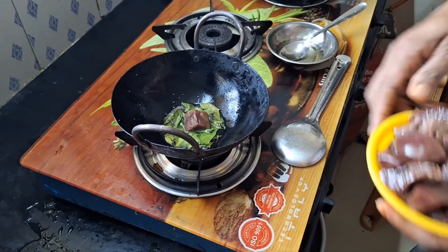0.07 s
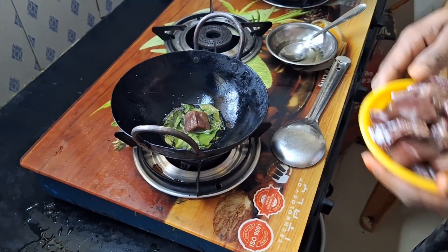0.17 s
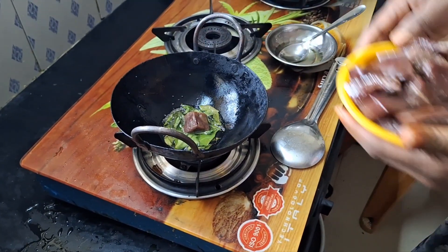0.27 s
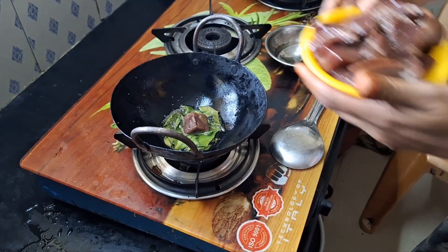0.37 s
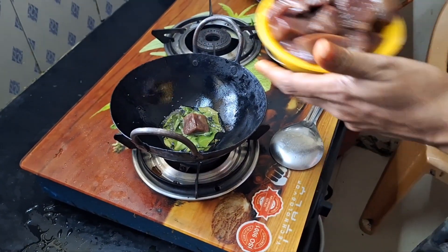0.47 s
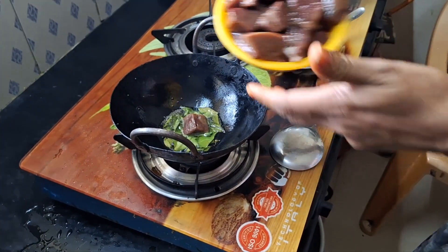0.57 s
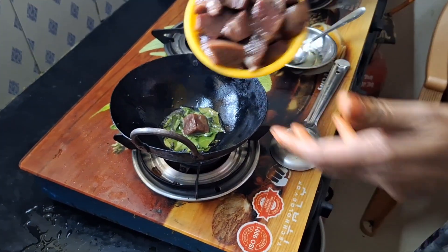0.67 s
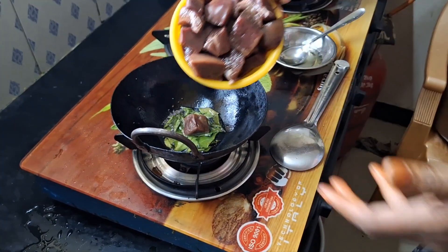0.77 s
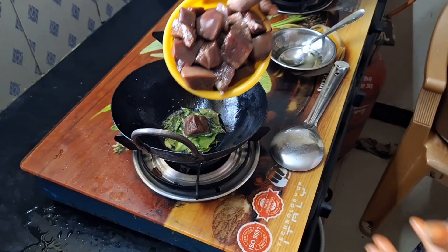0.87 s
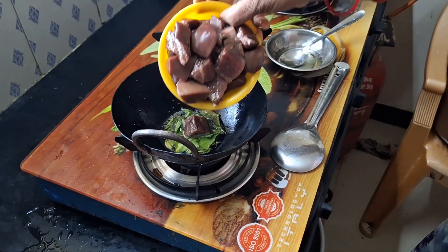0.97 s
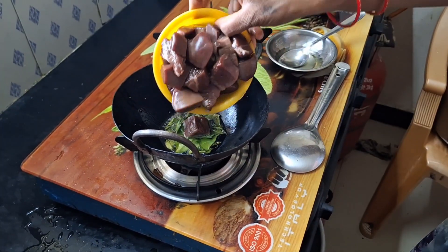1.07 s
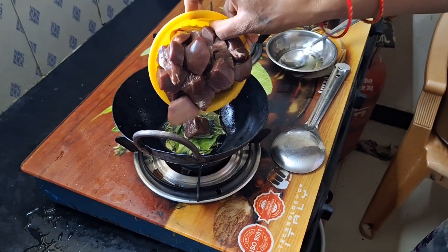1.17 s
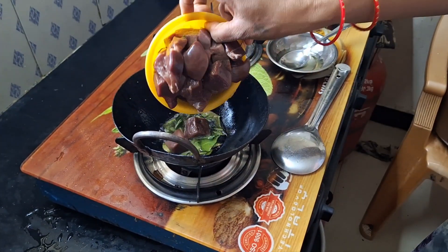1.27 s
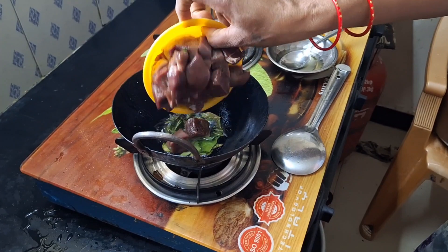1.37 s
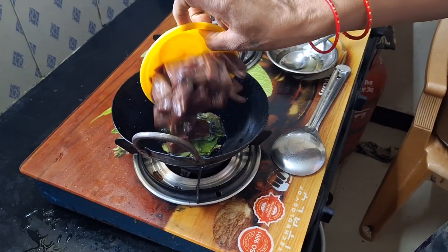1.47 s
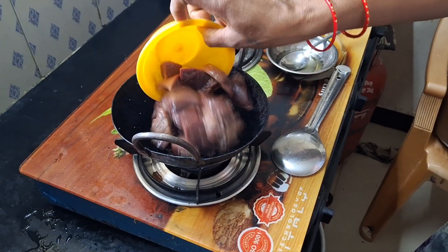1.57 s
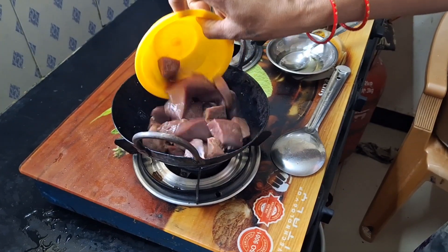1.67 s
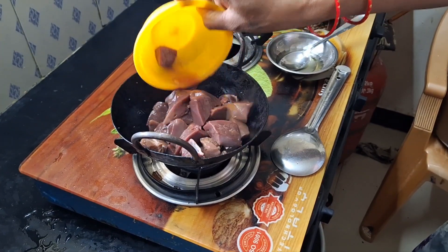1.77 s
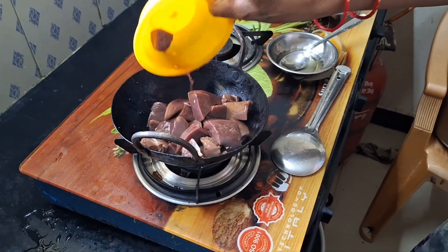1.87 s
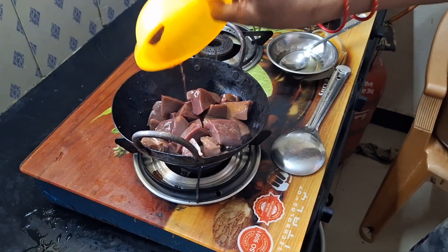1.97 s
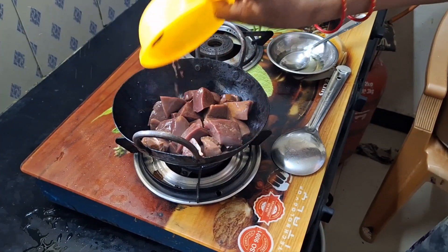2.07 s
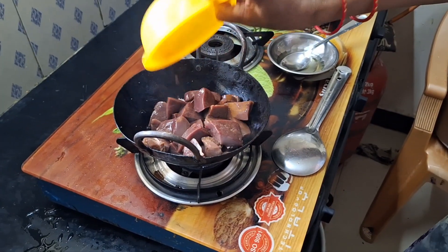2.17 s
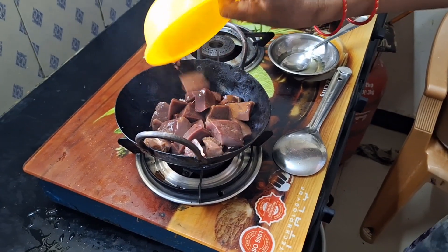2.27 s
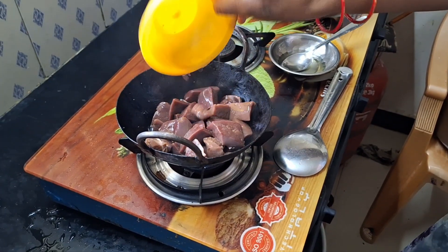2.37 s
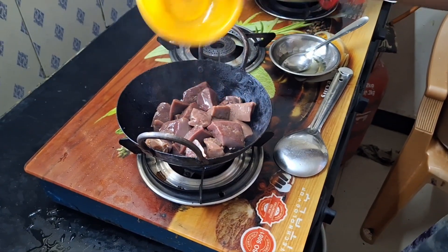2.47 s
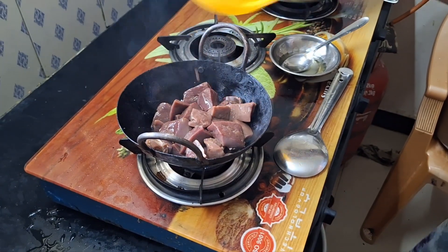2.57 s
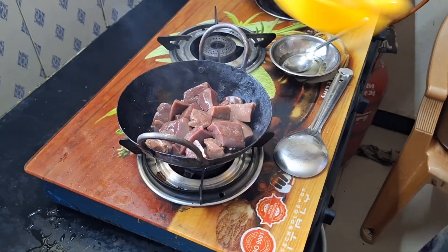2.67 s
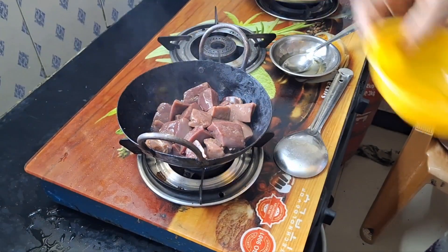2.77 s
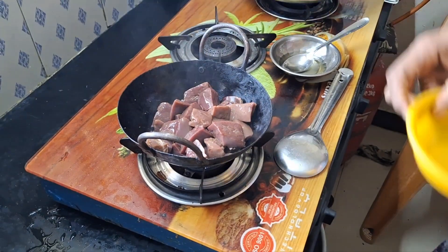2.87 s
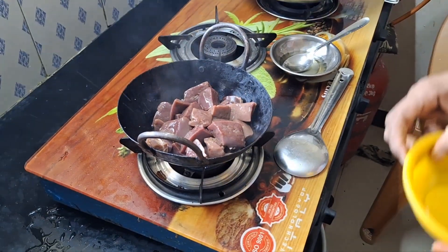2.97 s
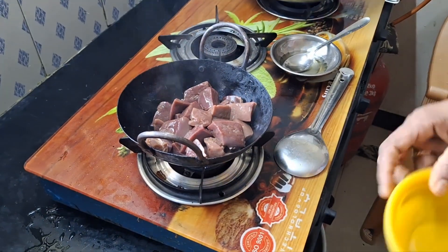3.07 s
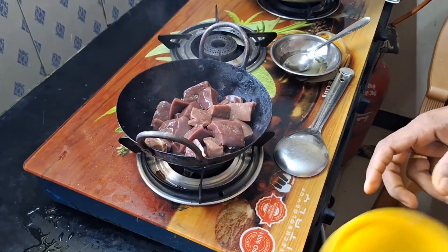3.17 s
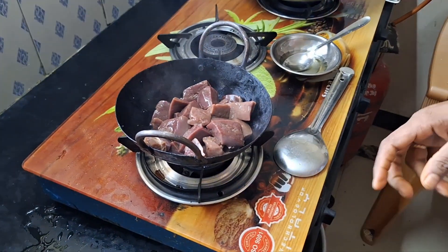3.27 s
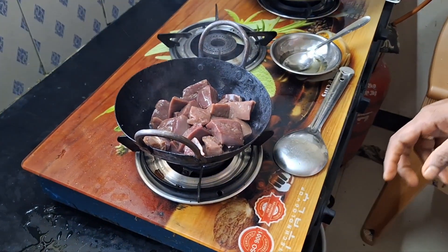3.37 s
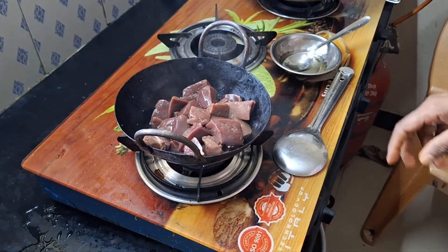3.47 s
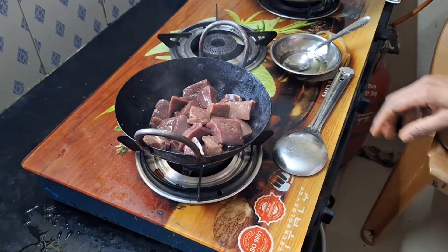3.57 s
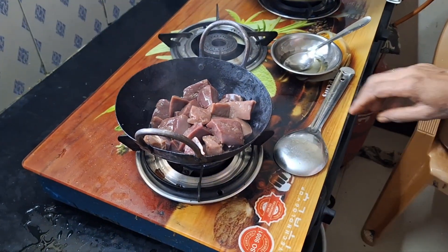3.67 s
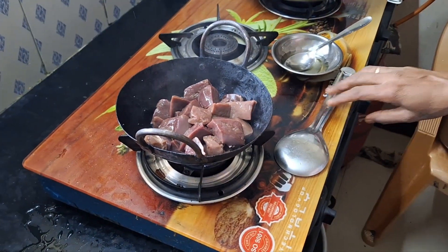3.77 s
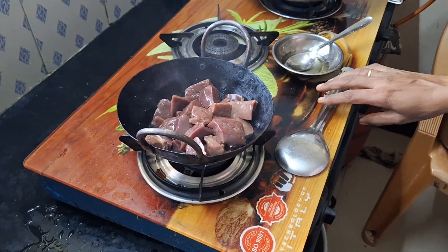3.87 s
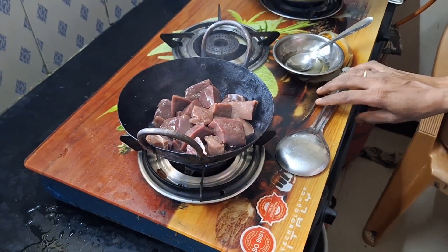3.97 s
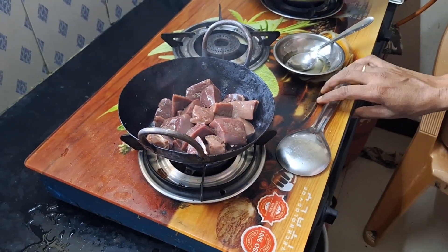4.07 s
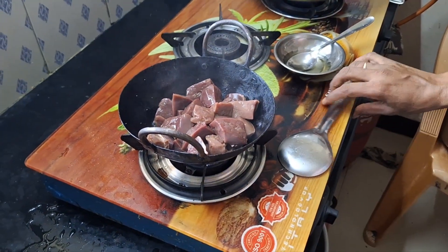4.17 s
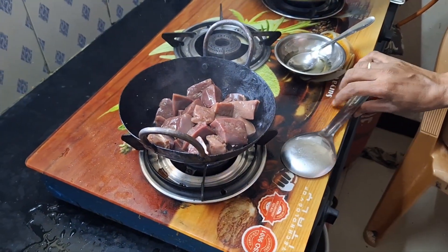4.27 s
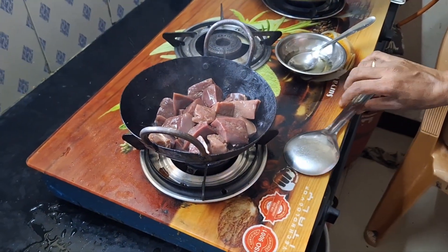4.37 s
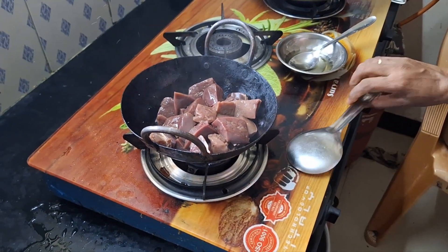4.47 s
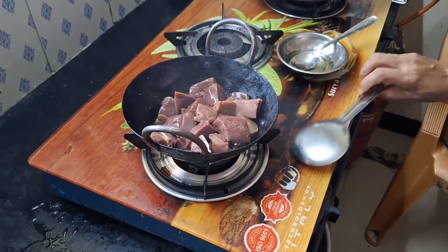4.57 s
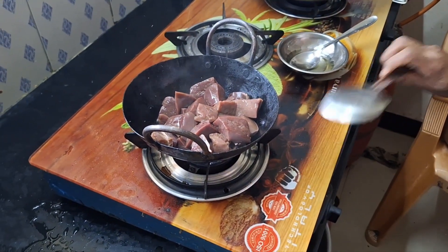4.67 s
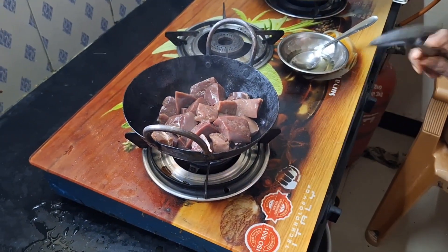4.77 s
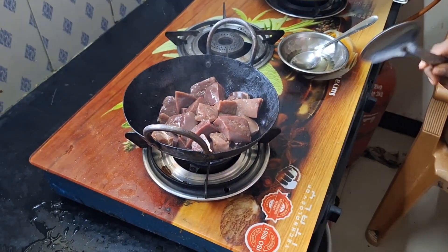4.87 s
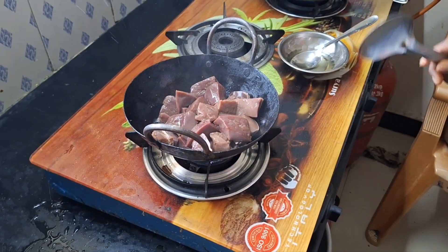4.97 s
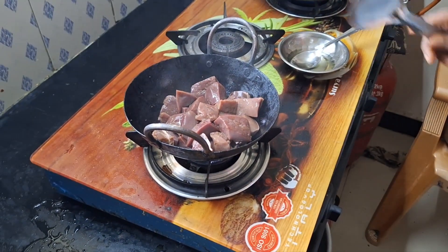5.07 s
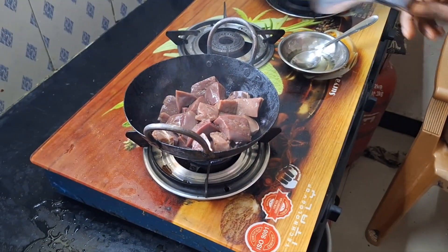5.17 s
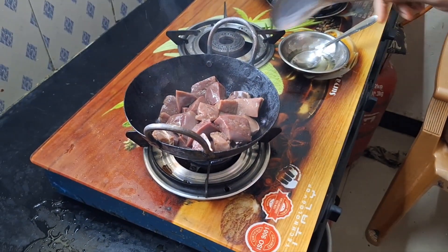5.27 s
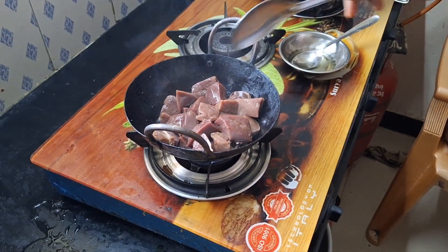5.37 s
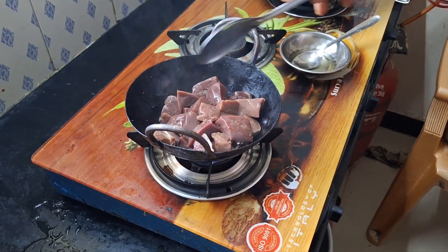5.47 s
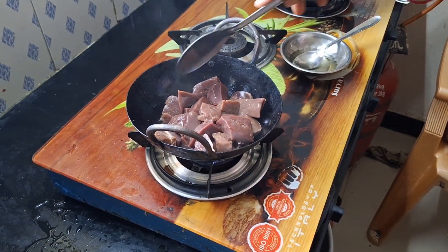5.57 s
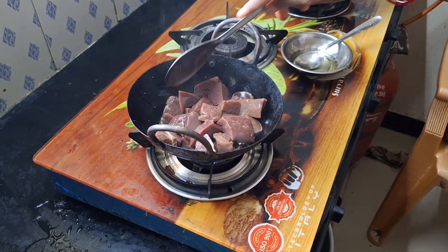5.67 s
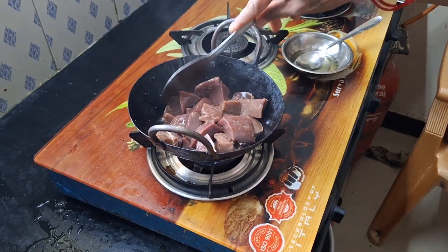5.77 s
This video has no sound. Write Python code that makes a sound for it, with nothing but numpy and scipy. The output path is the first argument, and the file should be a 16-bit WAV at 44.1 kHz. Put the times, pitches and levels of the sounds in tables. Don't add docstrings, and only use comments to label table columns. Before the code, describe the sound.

Over a low motor hum, isolated oil pops give way to a sudden loud frying hiss, with bright spits and soft knocks in a small kitchen.

```python
import sys
import numpy as np
from scipy import signal
from scipy.fft import rfft, irfft, next_fast_len
from scipy.io import wavfile
from scipy.ndimage import uniform_filter1d

SR = 44100
rng = np.random.default_rng(int(sys.argv[2]) if len(sys.argv) > 2 else 0)


def natural_amplitude(level_db):
    exponent = np.asarray(level_db, float) / 20
    return 10 ** exponent


def bounce(signal):
    frames = np.transpose(np.atleast_2d(signal))
    limited = np.clip(frames, -1, 1)
    pcm = np.round(limited * 32767).astype(np.int16)
    wavfile.write(sys.argv[1], SR, pcm)


N = 257233

# pitch_hz, level_db (per Hz)
PAN_COLOUR = [(250, -36), (430, -15.5), (660, -13.5), (850, -13), (1100, -4), (1490, -9.5), (2000, -3),
              (2500, 1), (3500, -1.5), (5800, 0.94), (7740, 1.16), (8730, -1.5), (11500, -2.5),
              (15600, -7.5)]


def frying():
    level_db, size_db, _ = vigour()
    length = next_fast_len(N + SR // 2, True)
    wet = 0
    for bubbles in fizz():
        path = way(wall_db=6.5, bowl_db=10.0, bowl_t60=0.013)
        wet = wet + rfft(bubbles, length) * rfft(path, length)
    even_hz = 250
    power = uniform_filter1d(abs(wet) ** 2, int(even_hz * length / SR), axis=1)
    wet = irfft(wet / np.sqrt(power), length)[:, :N]
    low, mid, top = split(colour(wet, PAN_COLOUR), 3200, 9000)
    clump_db = 1.6 * drift(30)
    low = natural_amplitude(1.12 + size_db + clump_db) * low
    top = natural_amplitude(-0.7 - 0.81 * size_db) * top
    return natural_amplitude(level_db + 5.5) * (low + mid + top) / mid.std()


# start_s, level_db, bubble_size_db (large ones up, fine spray down)
FRYING = [(0, -58.5, -6), (.6, -63.5, 4), (1.25, -56, -2.5), (1.45, -46.5, 0), (1.52, -54.5, 1.5),
          (1.59, -42, 4.5), (1.678, -24, -3.5), (1.74, -29.5, -1.5), (2.3, -29, 1), (2.6, -29, -1),
          (3.12, -29.5, 2), (3.25, -31.5, 1), (3.7, -30.5, 1), (4.4, -31, 0), (5.0, -32, 0.4),
          (5.83, -33, 1)]
# start_s, depth_db, length_s
LULLS = [
    (1.984, -5.5, 0.028),
    (2.177, -3.5, 0.015),
    (2.339, -4, .03),
    (2.81, -1, 0.033),
    (4.593, -4, 0.027),
    (4.743, -6.5, 0.017),
    (5.4, -2.5, 0.034),
    (5.553, -2.5, 0.026),
]


def vigour():
    start_s, level_db, size_db = np.transpose(FRYING)
    lull_s, depth_db, length_s = np.transpose(LULLS)
    t = np.arange(N) / SR
    steady_db = np.interp(t, start_s, level_db)
    lulls_db = fine(depth_db @ bumps(lull_s, length_s))
    return steady_db + lulls_db, np.interp(t, start_s, size_db), steady_db


def fizz(per_s=4500, spread_db=4.0, clump_db=0.79, hiss_db=-3.5, count=24, size=8):
    happens = rng.random(N) < per_s / SR
    strength = natural_amplitude(spread_db * np.minimum(rng.exponential(1, N), 3.9)) * happens
    kind = rng.integers(0, count, N)
    t = np.arange(300) / SR
    out = np.zeros((size, N))
    for k, hz in enumerate(np.geomspace(500, 17000, count)):
        glide = rng.uniform(-0.055, 0.094)
        turns = hz * t * (1 + glide * hz * t)
        grain = np.sin(2 * np.pi * turns) * np.exp(-hz * t / 2.42) * (turns < 12)
        grain = grain / np.linalg.norm(grain) * np.sqrt(hz)
        out[k % size] += signal.oaconvolve(strength * (kind == k), grain)[:N]
    hiss = natural_amplitude(hiss_db) * rng.standard_normal((size, N))
    return (evened(out) + hiss) * natural_amplitude(clump_db * drift(90))


# start_s, peak_db, bubble_pitch_hz, low_part_db (against the peak)
SPITS = [(1.963, -3.5, 4370, -7), (2.0625, -24, 5690, -22), (2.139, -7, 4600, -13), (2.2257, -8, 4430, -7),
         (2.2364, -4, 2390, -10), (2.375, -6, 9900, -13), (2.4912, -11, 6780, -25), (2.5394, -7, 2400, -5),
         (2.5627, -1.5, 6340, -5), (2.588, 2.5, 2620, -13.5), (2.6457, -5, 8000, -28),
         (2.8614, -10, 6950, -24), (2.9455, -16, 5170, -17), (2.9703, -14, 5880, -24),
         (3.0355, -11, 2480, -13), (3.0778, -1.5, 6200, -27), (3.1203, -2.5, 6100, -6),
         (3.1544, -16, 4580, -17), (3.3793, -7, 8140, -10), (3.5747, 1.5, 2980, -10.5),
         (3.6484, -10, 2480, -12), (3.8315, -10, 5940, -25), (3.921, -13, 6830, -21),
         (4.2674, -7, 6240, -16), (4.4061, -5.5, 4690, -10), (4.903, -5, 6800, -15), (4.934, -8, 6100, -21),
         (4.9753, -7, 6390, -17), (5.2067, 0.5, 2750, -18), (5.5067, -6.5, 4580, -21)]


def spits():
    return bursts(parts(SPITS, lean_db=-2.0, spread_db=3.5), boost_db=-7.5, low_db=0.0, top_db=-1.0,
                  crack_s=0.00027, ring_db=2.0, wall_db=0.5, bowl_db=2.0, snap_db=2)


# start_s, peak_db, bubble_pitch_hz, low_part_db (against the peak)
DROPS = [(0.0004, -23, 2370, -9), (0.0064, -18.5, 2600, -11), (0.0552, -25.5, 6600, -11),
         (0.182, -13.5, 4740, -21), (0.3055, -17, 2120, -14), (0.3373, -14, 1990, -9),
         (0.38, -7.5, 2670, -20), (0.4388, -17.5, 2530, -20), (0.504, -27, 9600, -27),
         (0.5631, -23.5, 7550, -37), (0.5878, -20, 2600, -9), (0.6914, -16.5, 2210, -14),
         (0.7922, -29.5, 9500, -27), (0.817, -10.5, 5470, -21.5), (0.8459, -12.5, 2440, -22),
         (0.9205, -12, 10600, -27), (0.9422, -31.5, 8630, -5), (1.0839, -41, 9540, -28),
         (1.1144, -44, 5620, -21), (1.149, -35, 11300, -27), (1.191, -32.5, 7890, -16),
         (1.2493, -17, 11500, -20), (1.3141, -19, 10900, -17), (1.3502, -21, 7220, -22),
         (1.3907, -23, 6060, -32), (1.5003, -20, 6840, -22), (1.5327, -23.5, 2940, -10.5),
         (1.5513, -18, 2470, -13), (1.5615, -18, 11000, -19), (1.6044, -21, 2930, 0)]


def drops():
    return bursts(parts(DROPS, lean_db=-1.0, spread_db=1.5), boost_db=-3.0, low_db=10.0, top_db=0.0,
                  crack_s=0.0007, ring_db=-8, wall_db=4.0, bowl_db=2.0, snap_db=8)


def parts(rows, lean_db, spread_db):
    start_s, peak_db, pitch_hz, low_db = np.transpose(rows)
    octaves = np.log2(pitch_hz / 5550)
    middle_db = peak_db - 0.5 * abs(octaves)
    top_db = peak_db + 6 * octaves
    pan_db = lean_db + spread_db * rng.standard_normal(len(rows))
    return np.transpose([start_s, middle_db, pitch_hz, peak_db + low_db, top_db, pan_db])


def bursts(rows, boost_db, low_db, top_db, crack_s, ring_db, wall_db, bowl_db, snap_db):
    t = np.arange(-100, 412) / SR
    s, db, hz, low, top, pan_db = np.transpose(rows)[..., None]
    after = np.maximum(t, 0)
    noise = rng.standard_normal((len(rows), 512)) * np.exp(-after / crack_s) * (t >= 0)
    tear = (t == 0) + 0.12 * noise
    bands = split(colour(tear, PAN_COLOUR), 3200, 9000)
    bands = [band / abs(band).max(1, keepdims=True) for band in bands]
    levels = (low + low_db, db, top + top_db)
    crack = sum(natural_amplitude(level) * band for level, band in zip(levels, bands))
    pitch_db = np.where(hz < 3200, levels[0], np.where(hz < 9000, db, levels[2]))
    ring = np.sin(2 * np.pi * hz * after) * np.exp(-after * hz / 3)
    crack = crack + natural_amplitude(pitch_db + ring_db) * ring
    crack *= natural_amplitude(boost_db) * np.clip(1 + t / 0.0018, 0, 1)
    snap = natural_amplitude(boost_db + levels[2] + snap_db) * bands[2]
    starts, pans_db = s[:, 0] + t[0], pan_db[:, 0]
    direct = placed(starts, snap, pans_db, [np.ones((2, 1))])
    ways = [way(wall_db, bowl_db, bowl_t60=0.032) for _ in range(8)]
    return direct + placed(starts, crack, pans_db, ways)


# start_s, peak_db, pitch_hz
KNOCKS = [(0.021, -38.5, 360), (0.045, -48, 238), (0.333, -28.5, 1500), (0.351, -40, 316),
          (0.567, -43, 260), (1.266, -15.5, 1280), (1.289, -21, 1340), (1.606, -8.5, 1150),
          (1.867, -27, 1080), (2.192, -21, 920), (2.401, -16.5, 1030), (2.453, -14.5, 1130),
          (2.723, -16.5, 1386), (2.838, -11, 1110), (3.116, -18, 1110), (3.196, -14, 1180),
          (3.567, -36, 1190), (3.882, -16, 1160), (4.399, -16.5, 1170), (4.638, -17.5, 1120),
          (4.901, -13.5, 1060), (5.239, -21, 1140), (5.617, -15.5, 1050)]


def knocks():
    t = np.arange(2000) / SR
    s, db, hz = np.transpose(KNOCKS)[..., None]
    fade = np.exp(-t * hz ** 1.5 / 68) * (1 - np.exp(-t / .0004))
    push = natural_amplitude(db - 4) * np.sin(2 * np.pi * hz * t) * fade
    ways = [way(wall_db=1.0, bowl_db=-2.0, bowl_t60=0.015) for _ in range(3)]
    return placed(s[:, 0], push, 0 * s[:, 0], ways)


MOTOR_HZ = (100.4, 146.7)
MOTOR_DB = (-40.5, -44.5)
DUCK_SHARES = (0.35, 0.5, 0.82, 0.048)
# start_s, swell_db
SWELLS = [(.62, 5), (.9, 2), (1.34, 4.5), (1.52, 4), (2.37, 4), (3.31, 4), (4.19, 2.5), (4.52, 2),
          (4.97, -1.5), (5.3, 4.5), (5.7, 3)]
# start_s, level_db
THUMPS = [(.02, -54), (.35, -67), (.56, -56), (0.951, -70), (1.61, -51), (1.82, -50), (2.0, -60),
          (2.12, -67), (2.37, -46.5), (2.75, -43), (2.98, -48), (3.25, -59), (3.73, -52), (4.07, -51),
          (4.33, -44), (4.5, -55), (4.7, -57), (4.9, -46), (5.25, -47), (5.65, -66)]
# pitch_hz, level_db (per Hz)
RUMBLE = [(15, -41), (30, -26), (45, -18), (60, -2.5), (76, -10.5), (120, -9), (190, -16), (290, -19.5),
          (550, -28), (900, -20.5), (2500, -38), (5000, -115)]


def hum():
    duck_from_db, duck_s = -38, 0.14
    over_db = uniform_filter1d(np.maximum(vigour()[2] - duck_from_db, 0), int(duck_s * SR))
    ducked = [natural_amplitude(-share * over_db) for share in DUCK_SHARES]
    swell_s, swell_db = np.transpose(SWELLS)
    thump_s, thump_db = np.transpose(THUMPS)
    swell = fine(swell_db @ bumps(swell_s, 0.057))
    thumps = fine(natural_amplitude(thump_db) @ bumps(thump_s, 0.025))
    low_level = natural_amplitude(MOTOR_DB[0] + swell + 0.24 * drift(16)) * ducked[0]
    high_level = natural_amplitude(MOTOR_DB[1] + 0.27 * drift(8.6)) * ducked[1]
    deep_level = natural_amplitude(-54 + 1.4 * drift(5.3)) * ducked[2]
    upper_level = natural_amplitude(-52) * ducked[3] + thumps
    lead = np.array([[0], [.25]])
    tones = 0
    for hz, level in zip(MOTOR_HZ, (low_level, high_level)):
        flutter = natural_amplitude(0.24 * drift(25))
        speed_hz = hz * (1 + .0034 * drift(6.64))
        turning = np.sin(2 * np.pi * np.cumsum(speed_hz) / SR + lead)
        tones = tones + np.sqrt(2) * level * flutter * turning
    air = colour(port_noise(N, lambda hz, s: 0 * hz * s), RUMBLE)
    deep, upper, room = split(air, 158, 520)
    rumble = 1.88 * deep_level * evened(deep) + 0.62 * upper_level * evened(upper)
    return tones + rumble + natural_amplitude(-59.0) * evened(room)


# pitch_hz, fade_s (time to fall 60 dB)
WALLS = [(200, 0.99), (1000, 0.16), (3000, 0.4), (8000, 0.27), (12000, 0.51), (16000, 0.11)]


def way(wall_db, bowl_db, bowl_t60):
    t = np.arange(16000) / SR
    walls = port_noise(len(t), lambda hz, s: -60 * s / read(WALLS, hz))
    walls = walls * np.clip(t / 0.0047, 0, 1)
    bowl = port_noise(1024, lambda hz, s: 0 * hz * s) * natural_amplitude(-60 * t[:1024] / bowl_t60)
    taps = natural_amplitude(wall_db) * walls / np.linalg.norm(walls[0])
    taps[:, :1024] += natural_amplitude(bowl_db) * bowl / np.linalg.norm(bowl[0])
    taps[(0, 1), rng.integers(0, 14, 2)] += 1
    return taps


# pitch_hz, likeness (1 same, 0 unrelated)
LIKENESS = [(60, 0.58), (150, 0.51), (380, 0.85), (950, -0.17), (2380, 0.12), (5980, -0.12), (15000, 0.26)]


def port_noise(length, decay):
    frames, hz = length // 128 + 5, np.fft.rfftfreq(512, 1 / SR)
    a, b, c, d = rng.standard_normal((frames, 257, 4)).T
    same = np.clip(read(LIKENESS, hz), -1, 1)[:, None]
    left, other = a + 1j * b, c + 1j * d
    z = np.array([left, same * left + np.sqrt(1 - same ** 2) * other])
    z *= natural_amplitude(decay(hz[:, None], np.arange(frames) * 128 / SR))
    return signal.istft(z, nperseg=512, noverlap=384)[1][:, :length]


def placed(starts, sounds, pans_db, ways):
    out = np.zeros((2, N))
    for k, (s, sound, pan_db) in enumerate(zip(starts, sounds, pans_db)):
        heard = signal.fftconvolve(sound[None], ways[k % len(ways)], axes=1)
        add(out, s, natural_amplitude(np.array([[.5], [-.5]]) * pan_db) * heard)
    return out


def add(mix, s, sound):
    part = mix[..., max(round(s * SR), 0):][..., :sound.shape[-1]]
    part += sound[..., :part.shape[-1]]


def evened(x):
    return x / np.sqrt(np.mean(x ** 2) + 1e-20)


def read(points, hz):
    f, value = np.transpose(points)
    return np.interp(np.log(hz + 1), np.log(f + 1), value)


def colour(x, points):
    gain_db = np.maximum(read(points, abs(np.fft.fftfreq(4096, 1 / SR))), -100)
    log_gain = np.log(natural_amplitude(gain_db))
    taps = np.fft.ifft(np.exp(log_gain - 1j * signal.hilbert(log_gain).imag)).real[:2048]
    taps = taps.reshape((1,) * (x.ndim - 1) + (-1,))
    return signal.oaconvolve(x, taps, axes=-1)[..., :x.shape[-1]]


def split(x, *edges_hz):
    length = next_fast_len(x.shape[-1], True)
    hz, z = np.fft.rfftfreq(length, 1 / SR), rfft(x, length)
    above = [1] + [1 / (1 + (edge / (hz + 1)) ** 6) for edge in edges_hz] + [0]
    return [irfft(z * (a - b), length)[..., :x.shape[-1]] for a, b in zip(above, above[1:])]


def drift(hz, count=24):
    t = np.arange(0, N + 64, 64) / SR
    slow = 0
    for f in np.geomspace(hz / 20, hz, count):
        slow = slow + np.sin(2 * np.pi * (f * t + rng.random())) / np.sqrt(f)
    return evened(np.interp(np.arange(N) / SR, t, slow))


def bumps(times, lengths):
    t = np.arange(0, N + 64, 64) / SR
    return np.exp(-((t - np.reshape(times, (-1, 1))) / np.reshape(lengths, (-1, 1))) ** 2)


def fine(coarse):
    return np.interp(np.arange(N), np.arange(len(coarse)) * 64, coarse)


# pitch_hz, left_over_right_db
LEAN = [(60, 4.0), (120, 4.0), (240, 3), (480, 0), (950, 3), (1890, 1.5), (3770, -3.5), (7520, -2.5),
        (15000, -4.5)]


def scene():
    mix = frying() + spits() + drops() + knocks() + hum()
    left, right = [[(hz, side * db / 2) for hz, db in LEAN] for side in (1, -1)]
    late = np.pad(mix[1], (6, 0))[:N]
    return np.array([colour(mix[0], left), colour(late, right)])


def roll_off(x):
    return signal.sosfilt(signal.butter(12, 16970, fs=SR, output="sos"), x)


def record(dry):
    ceiling = .95
    hz, _, z = signal.stft(ceiling * np.tanh(dry / ceiling), SR, nperseg=2048, noverlap=1536)
    power = (abs(z) ** 2).mean(0)
    fizz_power = uniform_filter1d(power[hz > 2000].mean(0), 5)
    weak = uniform_filter1d(power, 3, 0) < natural_amplitude(-27.0) * fizz_power
    upper_bass = ((hz > 175) & (hz < 460))[:, None]
    z *= np.where(weak & upper_bass, natural_amplitude(-13.0), 1)
    gated = signal.istft(z, SR, nperseg=2048, noverlap=1536)[1][:, :N]
    edge = signal.firwin(1535, 15790, window=("kaiser", 7), fs=SR)
    click_edge = signal.firwin(511, 16800, window=("kaiser", 8), fs=SR)
    low = signal.oaconvolve(gated, edge[None], "same")
    top = signal.oaconvolve(gated - low, click_edge[None], "same")
    power = (top ** 2).mean(0)
    sudden = uniform_filter1d(power, size=64) > natural_amplitude(23) * uniform_filter1d(power, size=2048)
    return roll_off(low + uniform_filter1d(1. * sudden, size=128) * top)


dry = scene()
out = record(dry)
bounce(out)
```